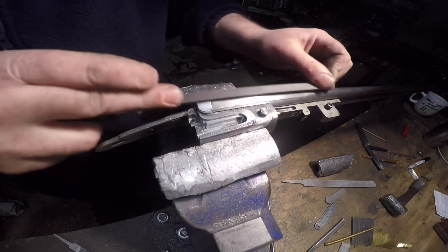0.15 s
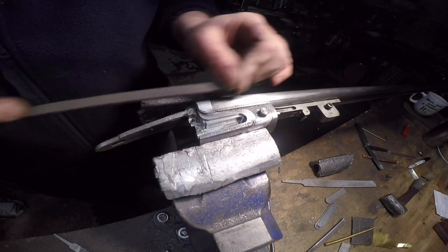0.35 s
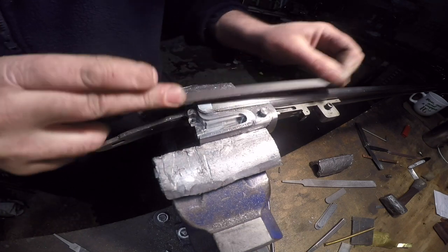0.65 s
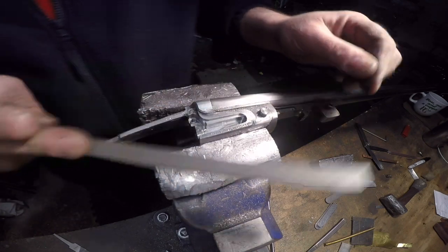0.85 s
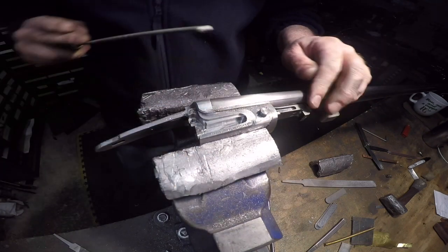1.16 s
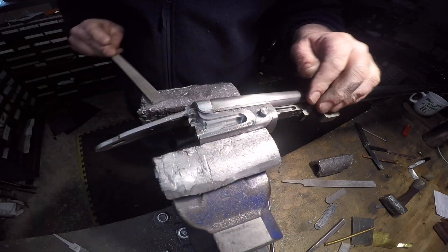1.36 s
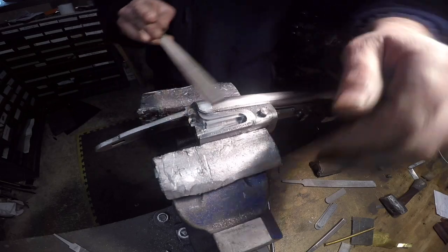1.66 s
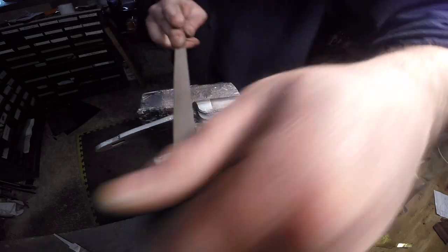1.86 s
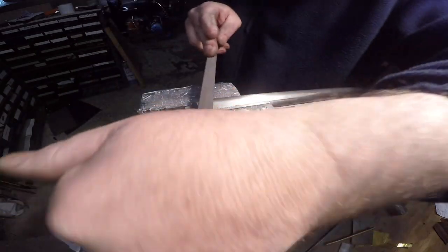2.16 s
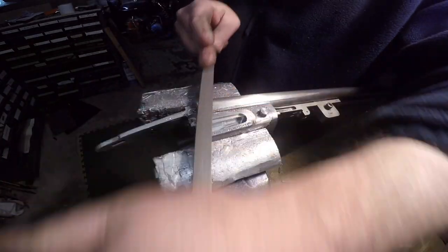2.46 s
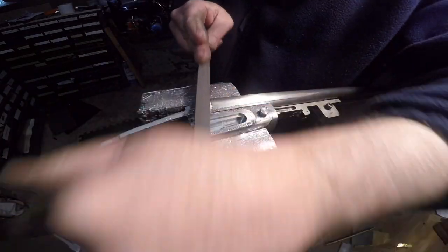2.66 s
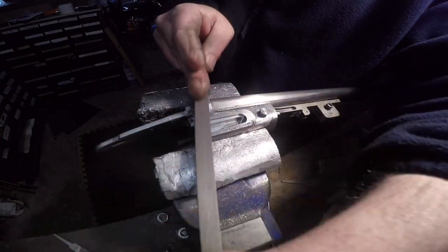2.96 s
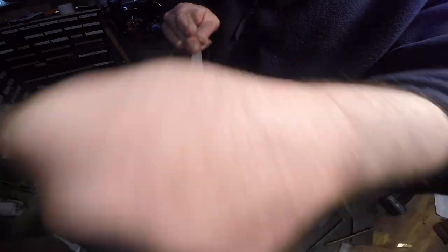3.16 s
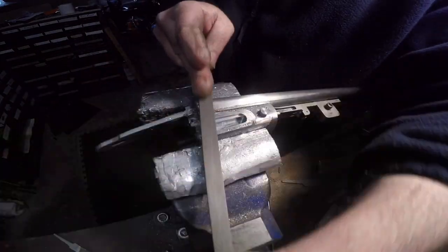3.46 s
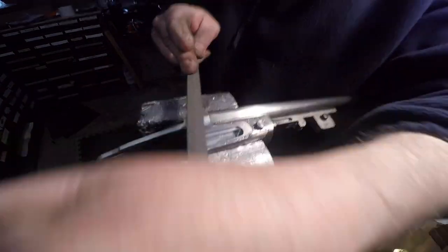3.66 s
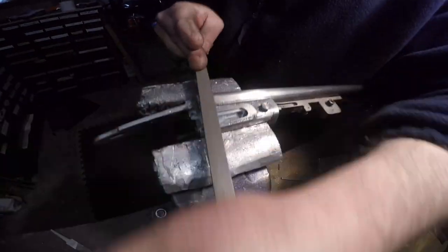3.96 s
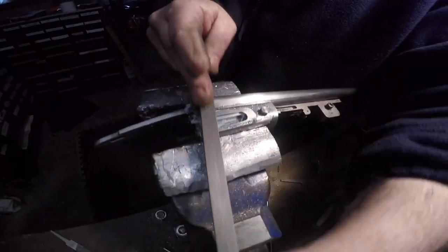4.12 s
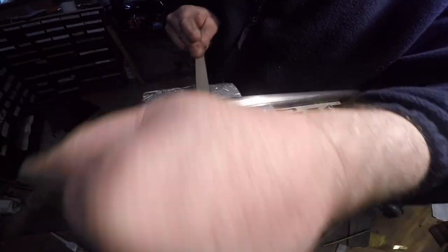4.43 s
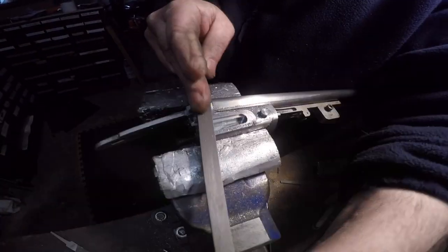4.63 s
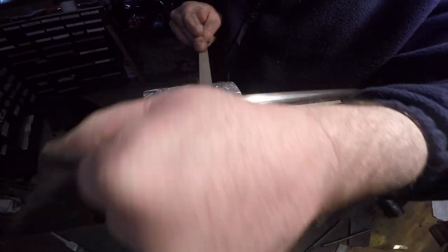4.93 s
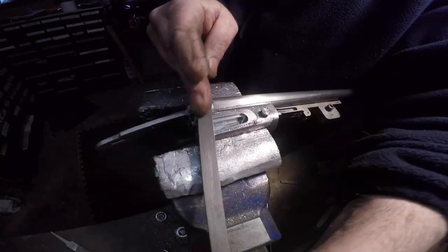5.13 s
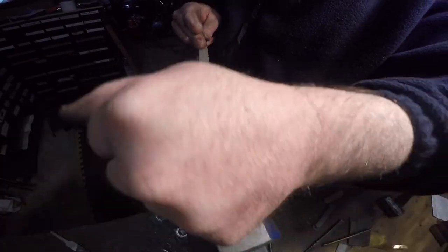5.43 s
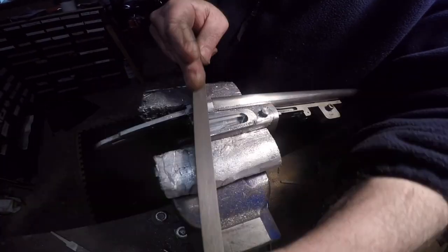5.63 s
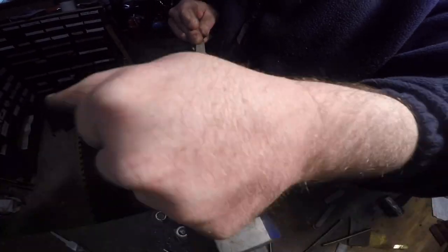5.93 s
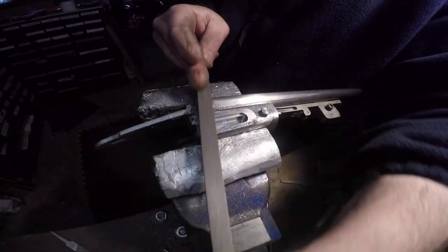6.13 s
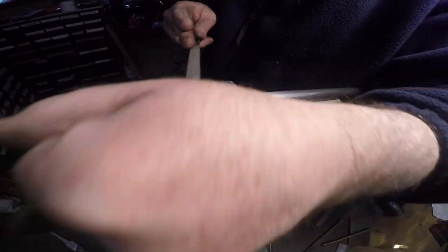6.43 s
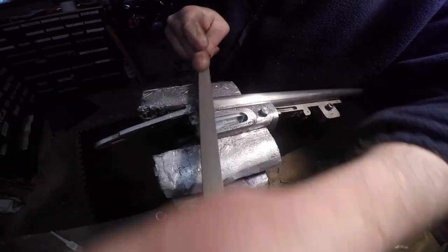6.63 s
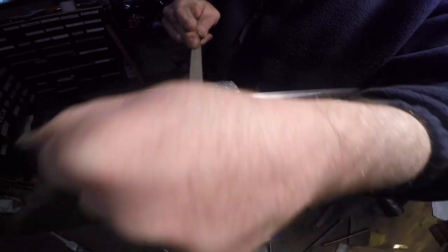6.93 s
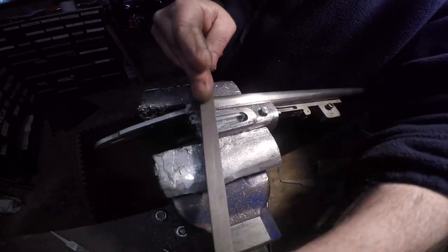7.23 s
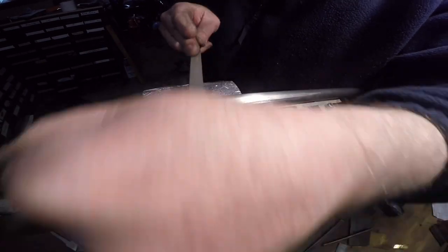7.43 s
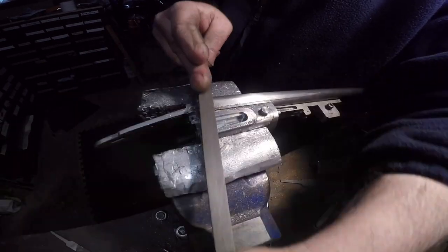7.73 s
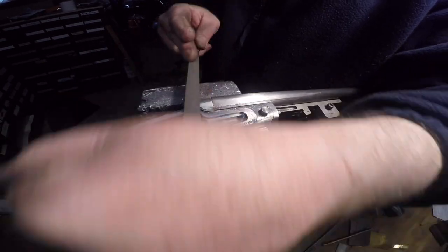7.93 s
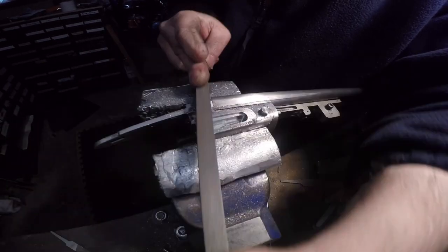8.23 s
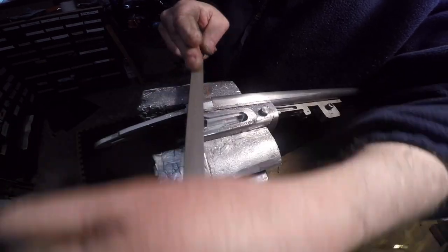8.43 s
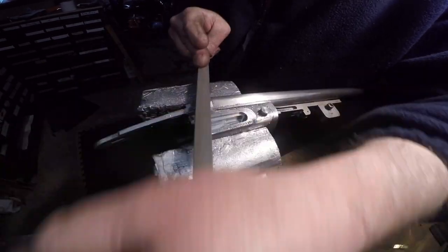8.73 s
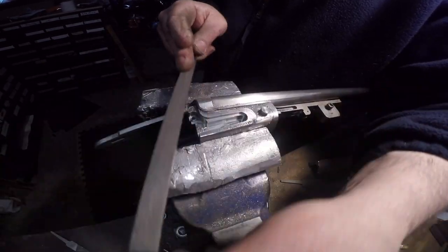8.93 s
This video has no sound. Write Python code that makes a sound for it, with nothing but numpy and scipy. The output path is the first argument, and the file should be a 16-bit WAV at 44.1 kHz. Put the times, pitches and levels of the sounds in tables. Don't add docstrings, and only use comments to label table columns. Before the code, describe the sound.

Steel filing heard very close: gritty, ringing rasps with fizzing metal dust and a low bench boom beneath. After two opening strokes the file clinks on the vise jaw, lighter rubs follow, then even strokes settle in. Midway a finger bumps the camera body, overloading the microphone with crackle and thud. Bench knocks with a brief buzz interrupt the later strokes. Small dry room, faint hush and thin electronic whine.

```python
import sys
import numpy as np
from scipy import signal
from scipy.fft import rfft, irfft
from scipy.io import wavfile
from scipy.ndimage import uniform_filter1d

SR = 44100
rng = np.random.default_rng(int(sys.argv[2]) if len(sys.argv) > 2 else 0)


def convert_level_to_amplitude(level_db):
    exponent = np.asarray(level_db, float) / 20
    return 10 ** exponent


def int16_out(signal):
    q = np.round(np.clip(np.atleast_2d(signal).T, -1, 1) * 32767)
    wavfile.write(sys.argv[1], SR, q.astype(np.int16))


N = 400428
T = np.arange(N) / SR

# fastest moment [t/s], speeding up [s], slowing down [s], cutting [level/dB], bench boom [level/dB]
STROKES = [(.08, .167, .138, -42, -42), (.605, .156, .115, -42.5, -47.5), (1.106, .121, .125, -60.5, -68),
           (1.383, .03, .14, -52, -48.5), (1.84, .11, .42, -66.5, -62.5), (2.278, 0.16, .086, -51, -55),
           (2.506, .135, .097, -40, -41), (2.716, .098, .091, -39.5, -40), (2.944, .146, .11, -40.5, -45.5),
           (3.461, .168, .147, -38, -46), (4.025, .18, .142, -38.5, -53.5), (4.1, .03, .045, -41, -70),
           (4.535, .12, .152, -38, -50), (5.109, .187, .108, -37, -49.5), (5.611, .138, .129, -38, -51.5),
           (6.113, .112, .19, -36.5, -51.5), (6.68, .117, .137, -37, -48.5), (7.173, .102, .19, -37, -52),
           (7.719, .139, .133, -38, -48), (7.868, .04, 0.042, -55.5, -65), (8.24, .14, .139, -37, -51),
           (8.453, .087, .05, -49.5, -61), (8.784, .118, .135, -38, -49.5), (8.915, .03, 0.019, -63.5, -75)]
# [f/Hz], width [f/Hz], [level/dB]
FILE = [(2840, 38, -9), (2894, 50, -0.5), (3548, 38, -7.5), (3856, 31, -20), (3860, 23, -5),
        (4174, 28, -12.5), (4370, 16, -6), (4309, 45, 1), (4280, 40, -13), (4790, 45, -2.5), (4860, 50, -3),
        (5176, 46, -8), (5790, 82, -7.5), (6073, 250, -9), (6460, 87, -5.5), (6840, 95, -9),
        (7520, 380, -14), (8550, 120, -20)]
# [f/Hz], [level/dB], time to fall 60 dB [t/s]
HOUSING = [(286, -12, 0.012), (410, -16, 0.005), (720, -9, 0.029), (865, 0, 0.014), (1041, -1, 0.023),
           (1285, 1.5, .02), (1640, 5, 0.0095), (2020, -1.5, 0.015), (2445, -2, 0.017), (2730, -4, 0.018),
           (3900, -2.5, 0.0066), (5125, -12.5, 0.006)]


def unit(x):
    return x / np.sqrt(np.mean(x ** 2))


def curves(tables):
    s, *columns = np.vstack(tables).T
    return [np.interp(T, s, column) for column in columns]


def mix_db(*levels_db):
    return 10 * np.log10(sum(convert_level_to_amplitude(2 * db) for db in levels_db))


def walk(rate):
    knots = rng.standard_normal(int(N / SR * rate) + 2)
    return 1.3 * np.interp(T * rate, np.arange(len(knots)), knots)


def band(x, lo_hz, hi_hz, order=2):
    sos = signal.butter(order, [lo_hz, min(hi_hz, .45 * SR)], "band", fs=SR, output="sos")
    return signal.sosfilt(sos, x)


def ring(x, hz, t60):
    decay = convert_level_to_amplitude(-60 / (t60 * SR))
    turn = 2 * np.pi * hz / SR
    return signal.lfilter([0, decay * np.sin(turn)], [1, -2 * decay * np.cos(turn), decay * decay], x)


def body(x, modes):
    return sum(convert_level_to_amplitude(db) * ring(x, hz, t60) for hz, db, t60 in modes)


def add(out, s, sound, db):
    i = int(s * SR)
    out[i:i + len(sound)] += (sound * convert_level_to_amplitude(db) / np.abs(sound).max())[:N - i]


def rattle(ms, seconds=.4):
    t = np.arange(int(seconds * SR)) / SR
    return rng.standard_normal(len(t)) * np.exp(-t * 1000 / ms)


def contact(ms, chatter_db, seconds=.4):
    hit = convert_level_to_amplitude(chatter_db) * rattle(ms, seconds)
    hit[0] = 1
    return hit


def arches(peak_db, power, stop_power, linger_s=0):
    drop_db = 30
    t = T[::64]
    s, rise, fall = np.array(STROKES).T[:3, :, None]
    progress = (t - s) / np.where(t < s, rise, fall + linger_s)
    roundness = np.where(t < s, power, stop_power)
    db = np.reshape(peak_db, (-1, 1)) - drop_db * np.abs(progress) ** roundness
    loudest = np.clip(progress[db.argmax(axis=0), np.arange(len(t))], -1, 1)
    total_db = 10 * np.log10(np.sum(convert_level_to_amplitude(2 * np.maximum(db, -150)), axis=0))
    return np.interp(T, t, total_db), np.interp(T, t, uniform_filter1d(loudest, size=9))


def cutting():
    arch_db, progress = arches(np.array(STROKES)[:, 3], 2.35, 2.7)
    return_db, return_t60_s, idle_db = -33.5, 1.3, -78
    decay = convert_level_to_amplitude(-120 / (return_t60_s * SR))
    held = signal.lfilter([1 / .05 / SR], [1, -decay], convert_level_to_amplitude(2 * arch_db))
    held_db = 10 * np.log10(held + 1e-18)
    cut_db = mix_db(arch_db, held_db + return_db, idle_db)
    along_db = 2 * (T < 1.0)
    bright_db = -14 + 2 * progress + along_db
    part_share = 0.57
    part_db = -14.5 + 1.5 * progress + along_db
    part_db = part_db - (1 - part_share) * np.clip(cut_db + 34.5, -20, 0)
    return cut_db, bright_db, part_db, progress


def teeth(per_s=14000, scatter_db=2.0):
    bites = rng.random(N) < per_s / SR
    return bites * convert_level_to_amplitude(scatter_db * rng.exponential(size=N)) * rng.standard_normal(N)


def tooth_rows(cut_db, progress):
    glide = (2.2 * (progress + .8) + .2 * walk(4)) % 1
    wobble_db = .08 * np.minimum(cut_db + 36, 0) + .4 * walk(12) + .3 * walk(500)
    row_hz = 3550 * 2 ** (.42 * glide) * convert_level_to_amplitude(wobble_db)
    turns = 2 * np.pi * np.cumsum(row_hz) / SR
    tone = np.sin(turns) + 0.34 * np.sin(2 * turns / 3) + 0.54 * np.sin(1.5 * turns)
    tone = tone + 0.24 * np.sin(2 * turns) + .15 * np.sin(3 * turns)
    bite_db = 3.0 * walk(90) + .5 * np.minimum(cut_db + 49.5, 0)
    return unit(tone * np.sin(np.pi * glide) * convert_level_to_amplitude(bite_db))


def resonate(force, peaks, patchy_db, tilt_db=0):
    t60_width = np.log(1000) / np.pi
    total = 0
    for hz, width, db in peaks:
        level_db = db + patchy_db * walk(25) + tilt_db * np.log2(hz / 4000)
        total = total + convert_level_to_amplitude(level_db) * width ** .5 * unit(ring(force, hz, t60_width / width))
    return unit(total)


def filing(cut_db, bright_db, part_db, progress):
    # [f/Hz], width [f/Hz], [level/dB]
    part_peaks = [(644.7, 24, -5), (1090, 60, -6.5), (1330, 180, -3), (1650, 40, -0.5), (1902, 190, 12.5),
                  (2142, 80, -2.5), (2680, 350, -6)]
    # [f/Hz], width [f/Hz], [level/dB]
    dust_peaks = [(8550, 300, -8.5), (9980, 330, -4), (10800, 590, 2), (12000, 700, 2), (13600, 450, -5.5)]
    rows = tooth_rows(cut_db, progress)
    force = unit(teeth())
    slow_db = .25 * np.clip(cut_db + 40, -24, 0)
    blade = unit(band(resonate(force + convert_level_to_amplitude(-14) * rows, FILE, 3.8, slow_db), 2800, 9500, order=3))
    blade = blade + convert_level_to_amplitude(-14.0 - 4.0 * progress) * rows
    blade = blade + convert_level_to_amplitude(-7.0 - .5 * slow_db) * unit(band(force, 2700, 7500))
    part = unit(band(resonate(force, part_peaks, 3.0), 550, 2700))
    part = part + convert_level_to_amplitude(-12 - 2.2 * slow_db) * unit(band(force, 1150, 1750))
    dust = teeth() * convert_level_to_amplitude(1.3 * walk(60))
    fizz = unit(band(dust, 5000, 16000)) + convert_level_to_amplitude(-3.5) * resonate(dust, dust_peaks, 2.8)
    fizz_db = bright_db + .4 * slow_db + 2.0 * walk(35)
    return convert_level_to_amplitude(cut_db) * (unit(blade) + convert_level_to_amplitude(part_db) * unit(part) + convert_level_to_amplitude(fizz_db) * unit(fizz))


def landings():
    # [t/s], peak [level/dB], snap [f/Hz], ring time [t/s]
    hits = [(0.4583, -29.5, 4550, 0.043), (2.0951, -38, 4080, 0.023), (3.3083, -31.5, 4600, 0.038),
            (3.875, -28, 4470, 0.024), (4.0942, -33, 4840, 0.02), (4.3944, -39.5, 4790, 0.021),
            (4.9248, -26, 4290, 0.03), (5.4804, -29, 4860, 0.019), (6.0126, -26.5, 5000, 0.015),
            (6.562, -24.5, 3900, 0.031), (7.0544, -46, 4770, 0.018), (7.5901, -31, 5000, 0.014),
            (8.093, -42, 3640, 0.018), (8.3992, -36, 4860, 0.014), (8.6482, -33.5, 4790, 0.029)]
    out = np.zeros(N)
    for s, db, hz, t60 in hits:
        hit = contact(1.24, -5, .2)
        modes = [(f, f_db / 2 + 2 * rng.standard_normal(), max(t60, .005)) for f, _, f_db in FILE]
        snap = convert_level_to_amplitude(7) * ring(hit, hz, 0.012) + convert_level_to_amplitude(-9) * hit
        add(out, s, band(body(hit, modes) + snap, 2400, 20000), db)
    return out


def jaw_taps():
    # [t/s], peak [level/dB]
    hits = [
        (1.3635, -24),
        (1.3647, -17.5),
        (1.3663, -19),
    ]
    # [f/Hz], [level/dB], time to fall 60 dB [t/s]
    jaw = [(2790, -8.5, 0.037), (4740, 7, 0.011), (5110, -5, 0.038), (5470, 2.5, 0.019), (6280, -7, 0.023),
           (7330, -8.5, 0.025), (8200, -16, 0.023), (10750, -21, 0.034)]
    out = np.zeros(N)
    for s, db in hits:
        add(out, s, band(body(contact(1.0, -7, .2), jaw), 2200, 14500), db)
    return out


def return_clicks():
    # [t/s], peak [level/dB]
    hits = [(3.1198, -57), (3.7614, -46), (4.2564, -47.5), (4.8662, -46.5), (5.4067, -47.5),
            (5.9074, -40.5), (6.332, -39), (6.923, -44), (7.4145, -40), (7.9823, -51), (8.4652, -42)]
    # [f/Hz], [level/dB], time to fall 60 dB [t/s]
    modes = [(7270, -3, 0.036), (8200, -7.5, .008), (10100, -5.5, .008)]
    out = np.zeros(N)
    for s, db in hits:
        hit = rattle(5.36, .2)
        add(out, s, body(hit, modes) + convert_level_to_amplitude(18) * band(hit, 6500, 15000), db)
    return out


def bench(cut_db):
    # [t/s], sway [level/dB]
    lean = [
        [(0.0, -42), (0.55, -49.5), (0.95, -44), (1.16, -64), (1.33, -47.5), (1.4, -67.5), (2.81, -33.5),
         (3.26, -49.5), (3.62, -39)],
        [(3.9, -34), (4.1, -29), (4.16, -48), (4.3, -32), (4.55, -42), (5.23, -37.5), (5.44, -46.5),
         (8.99, -41.5), (9.08, -45)],
    ]
    sway_db = curves(lean)[0]
    boom_arch_db, _ = arches(np.array(STROKES)[:, 4], 2.6, 2.6, linger_s=.17)
    boom_db = mix_db(boom_arch_db, -68.5)
    frame_db = -60 + 0.25 * (cut_db + 38.5) + .3 * (boom_db + 52.5)
    push = rng.standard_normal((3, N))
    sway = unit(band(push[0], 12, 25)) + convert_level_to_amplitude(-20) * unit(band(push[0], 60, 76))
    boom = unit(body(push[1], [(108.0, 18.3, 0.37), (91.9, 5.1, .1), (126, 7.7, .08)]))
    frame = unit(body(push[2], [(264.4, 15, 0.055), (417, -23.0, .04), (675, 14.5, 0.032)]))
    return convert_level_to_amplitude(sway_db - 3.0) * sway + convert_level_to_amplitude(boom_db) * boom + convert_level_to_amplitude(frame_db) * frame


def bench_knocks():
    # [t/s], peak [level/dB], hollow [level/dB], edge [level/dB], thin panel [level/dB]
    hits = [
        (1.378, -36, -9, -30, -3),
        (6.185, -35.5, -1, -21, 3),
        (6.205, -26, -3, -11, 7),
        (6.2082, -21, 0.5, -19, -2),
        (6.281, -39, -8, 7.5, 14),
        (6.289, -31.5, -0.5, -28, 1),
        (7.2956, -30, -1, -24, -1),
        (7.299, -24.5, -4, -29, -4.5),
    ]
    # [f/Hz], [level/dB], time to fall 60 dB [t/s]
    wood = [(665, -14, 0.14), (750, -3, 0.044), (894, 0, 0.0081)]
    panel = [(1607, 5.5, 0.019), (1590, -23, .2), (1890, -4, 0.025), (1960, -9, 0.034)]
    hollow = [(102.8, -4, 0.53), (255.5, 7, 0.2), (252, -8.5, 0.6), (312, 1, 0.11), (403, -8.5, 0.29)]
    out = np.zeros(N)
    for s, db, hollow_db, edge_db, panel_db in hits:
        hit = np.convolve(contact(2.4, -16, .5), np.hanning(9))
        add(out, s, body(hit, wood), db)
        add(out, s, body(hit, panel), db + panel_db)
        add(out, s + 0.00228, body(hit, hollow), db + hollow_db)
        add(out, s, band(rattle(5.9, .1), 3200, 4900), db + edge_db)
    return out


def loose_sheet():
    # [t/s], peak [level/dB]
    hits = [
        (6.21, -43),
        (7.30, -46.5),
    ]
    # [f/Hz], [level/dB], time to fall 60 dB [t/s]
    modes = [(251.2, -3.5, 0.99), (307, -5, 0.22), (324, -4.5, 0.23), (383, -13, 0.34), (565, -4, 0.066),
             (680, 1, 0.042), (875, -4, .05), (1540, -6, 0.053)]
    out = np.zeros(N)
    for s, db in hits:
        add(out, s, body(rattle(530.0, 2.5), modes), db)
    return out


def sleeve_scuffs():
    # [t/s], peak [level/dB], tone [f/Hz]
    hits = [
        (.81, -59, 590),
        (.92, -53.5, 706),
    ]
    out = np.zeros(N)
    for s, db, hz in hits:
        brush = rattle(21.0)
        swell = np.minimum(T[:len(brush)] / 0.008, 1)
        add(out, s, ring(brush * swell, hz, 0.027), db)
    return out


def finger_drag():
    # [t/s], [level/dB], hiss against it [level/dB]
    drag = [
        (3.671, -52, -3.5),
        (3.6735, -24, -8),
        (3.682, -14.5, -16.5),
        (3.688, -7, -19.5),
        (3.694, -11, -18),
        (3.700, -29.5, -18.5),
        (3.714, -42.5, -10),
        (3.72, -88.5, -18),
    ]
    out = np.zeros(N)
    part = slice(int(drag[0][0] * SR), int((drag[-1][0] + 0.084) * SR))
    drag_db, hiss_db = (column[part] for column in curves([drag]))
    grit = teeth(per_s=6900)[part]
    shell = body(grit * convert_level_to_amplitude(drag_db), HOUSING) / np.std(body(grit, HOUSING))
    air = rng.standard_normal(len(grit))
    hiss = unit(band(air, 2600, 12830)) + convert_level_to_amplitude(-5.5) * unit(ring(air, 10000, 0.015))
    out[part] = shell + hiss * convert_level_to_amplitude(drag_db + hiss_db)
    return out


def housing_raps():
    # [t/s], peak [level/dB], contact time [ms]
    hits = [
        (3.684, -5.5, 0.2),
        (3.6892, -6.5, .3),
        (3.692, -1, .15),
        (3.7169, -12.5, .6),
        (3.776, -25, 0.9),
        (3.796, -22, 1.1),
        (3.8133, 3, .06),
        (3.817, -8, .4),
        (3.824, -19, 0.9),
    ]
    out = np.zeros(N)
    for s, db, ms in hits:
        push = np.hanning(int(ms * SR / 1000) + 3)
        blow = body(contact(1.0, -8), HOUSING) + band(rattle(0.39), 2500, 12210)
        add(out, s, np.convolve(blow, push), db)
    return out


def mount_clamp():
    # [t/s], peak [level/dB]
    hits = [
        (3.70, -21),
        (3.813, -22.5),
    ]
    # [f/Hz], [level/dB], time to fall 60 dB [t/s]
    modes = [(1060, -13, .12), (1880, 0, .2), (1852, -9, .12), (2476, -12, .08), (2622, -18, .12),
             (2780, -22, .15), (2997, -15, .15)]
    out = np.zeros(N)
    for s, db in hits:
        add(out, s, body(contact(1.0, -38.5), modes), db)
    return out


def rocking_mount():
    # [t/s], signed swing [0-1], start [f/Hz], end [f/Hz], time to fall 60 dB [t/s]
    rocks = [
        (3.678, -.22, 23, 52, 0.043),
        (3.684, .68, 46, 21.8, 0.16),
        (3.745, -.15, 22, 22, 0.48),
        (3.8151, -.2, 300, 120.6, 0.027),
    ]
    out = np.zeros(N)
    t = T[:SR // 2]
    for s, swing, hz, end_hz, t60 in rocks:
        turns = np.cumsum(end_hz + (hz - end_hz) * np.exp(-t / 0.02)) / SR
        fade = convert_level_to_amplitude(-60 * t / t60) * (1 - np.exp(-t / .003))
        add(out, s, np.sign(swing) * np.sin(2 * np.pi * turns) * fade, 20 * np.log10(abs(swing)))
    return out


def workshop():
    # [f/Hz], [level/dB] per Hz
    room = [(88, -32), (150, -12), (263, -15.5), (339, -5.5), (428, -4.5), (583, -11), (781, -11),
            (1000, -12), (1480, -15.5), (2020, -13), (6110, -18.5), (15500, -28.5)]
    # [f/Hz], rms [level/dB]
    tones = [(6293, -78), (6325, -79), (8543, -90), (12618, -84)]
    f = np.maximum(np.arange(N // 2 + 1) * SR / N, 1)
    hz, db = np.transpose(room)
    colour = convert_level_to_amplitude(np.interp(np.log(f), np.log(hz), db, left=-90, right=-90))
    hush = unit(irfft(rfft(rng.standard_normal(N)) * colour, N)) * convert_level_to_amplitude(-65 + walk(2.3))
    whine = np.zeros(N)
    for hz, db in tones:
        turns = hz * T + .08 * walk(30)
        whine += convert_level_to_amplitude(db + 1.5 * walk(21)) * 2 ** .5 * np.sin(2 * np.pi * turns)
    return hush + whine


def room_tail(air):
    t = T[:SR // 3]
    tail = band(rng.standard_normal(len(t)), 150, 7000, order=1) * convert_level_to_amplitude(-60 * t / 0.26) * (t > .004)
    return signal.fftconvolve(air, tail / np.sqrt(np.sum(tail ** 2)))[:N]


def scene():
    cut = cutting()
    air = filing(*cut) + landings() + jaw_taps() + return_clicks()
    air = air + bench_knocks() + loose_sheet() + sleeve_scuffs()
    handling = finger_drag() + housing_raps() + mount_clamp() + rocking_mount()
    return (air + convert_level_to_amplitude(-18) * room_tail(air) + bench(cut[0]) + handling + workshop())[None]


def top_cut(x):
    return signal.sosfilt(signal.butter(12, 16500, fs=SR, output="sos"), x)


def record(dry):
    top = signal.ellip(10, .2, 60, 15100, fs=SR, output="sos")
    mix = np.clip(signal.sosfilt(top, dry), -.99, .99)
    return top_cut(mix)


dry = scene()
out = record(dry)
int16_out(out)
```